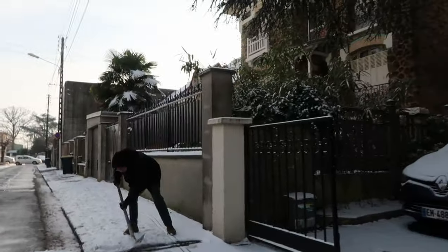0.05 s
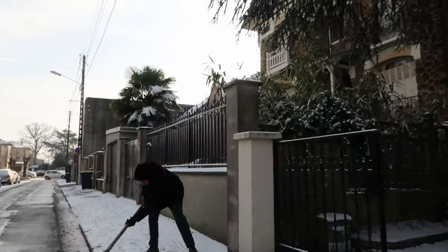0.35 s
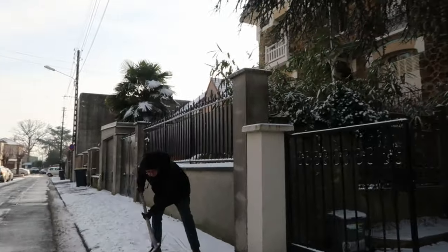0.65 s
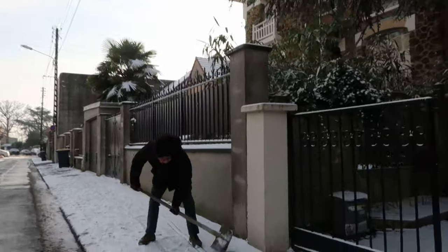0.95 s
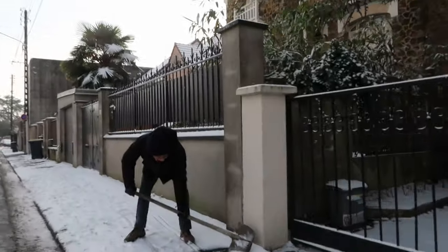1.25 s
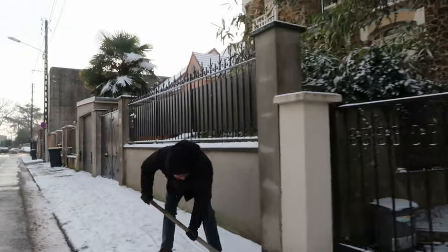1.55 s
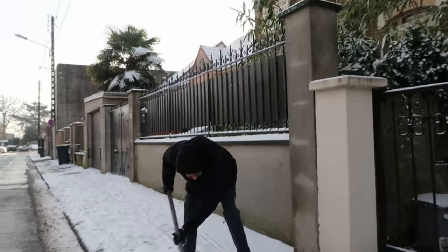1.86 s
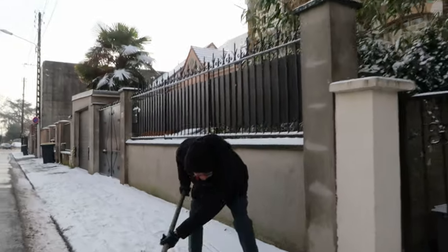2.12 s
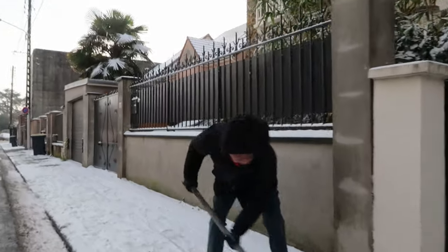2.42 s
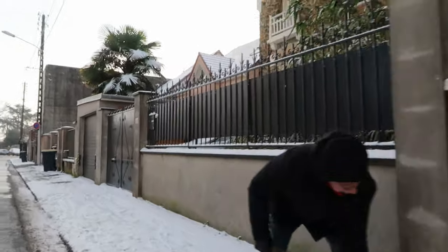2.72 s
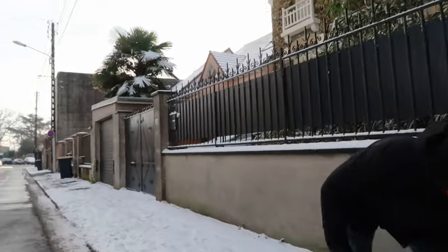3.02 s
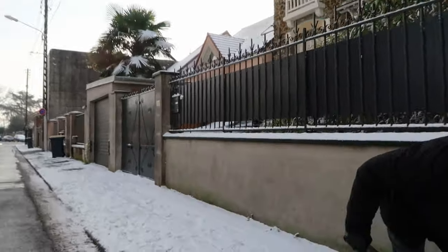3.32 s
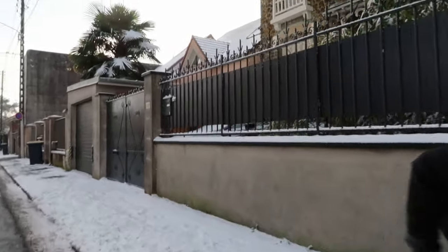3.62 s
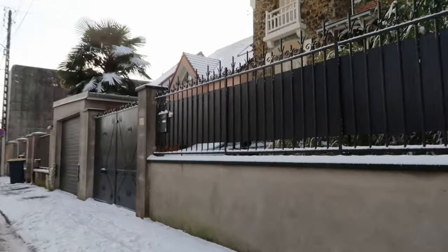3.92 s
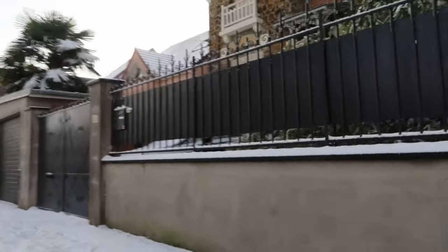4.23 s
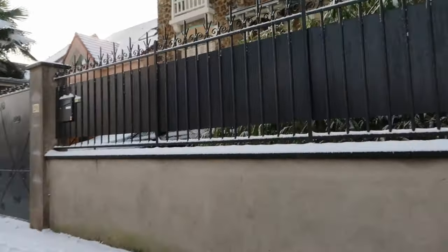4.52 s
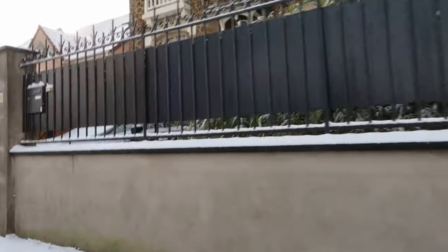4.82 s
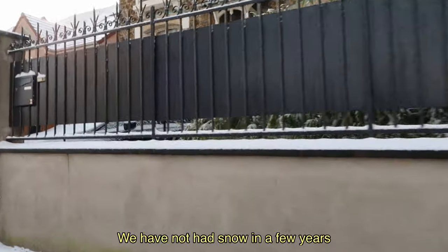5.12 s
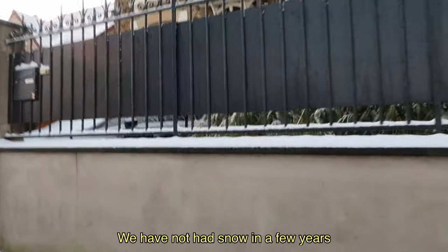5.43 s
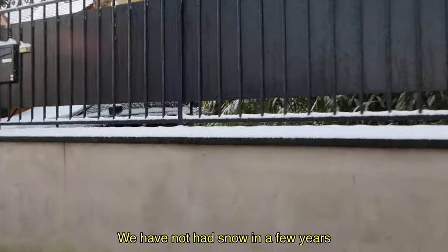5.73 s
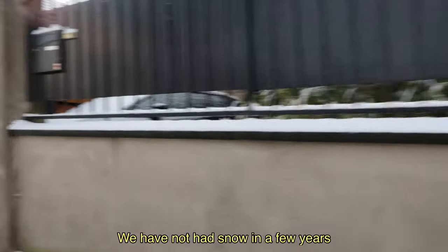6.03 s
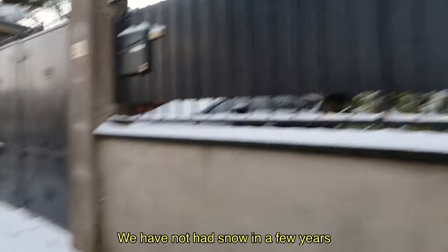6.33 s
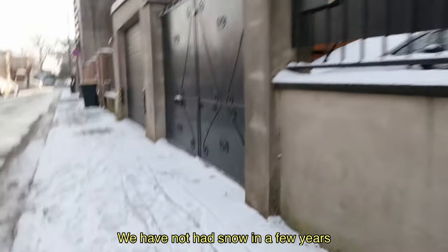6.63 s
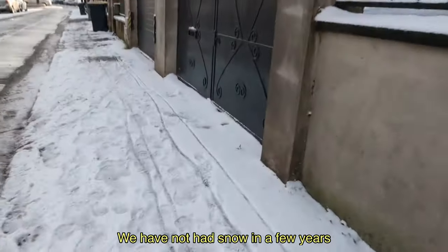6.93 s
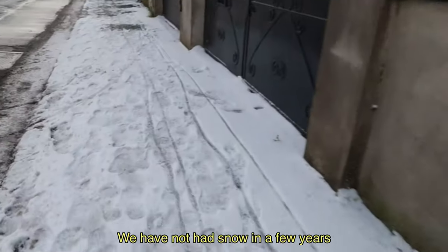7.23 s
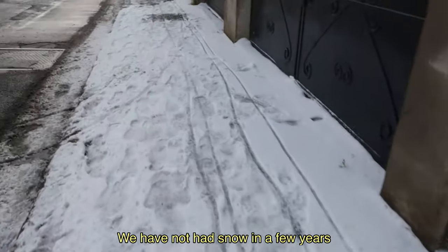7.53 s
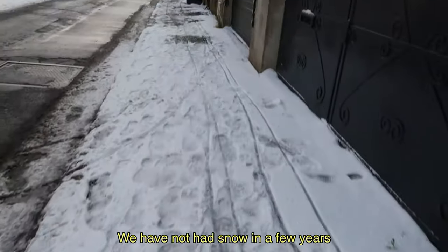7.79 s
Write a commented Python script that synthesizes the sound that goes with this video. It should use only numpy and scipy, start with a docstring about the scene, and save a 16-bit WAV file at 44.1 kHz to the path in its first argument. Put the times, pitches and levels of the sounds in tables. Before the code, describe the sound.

A metal shovel scrapes snow off gritty pavement in repeated strokes on a quiet street, with wind buffeting the microphone and two crunching footsteps.

```python
"""A quiet street: a metal shovel scrapes snow off the pavement in strokes, to the right of the microphone.
The edge chatters over grit, catches and rings the blade, whose resonances shift from stroke to stroke.
Every push swells, holds and dies away by one rule. Bits of ice tick, a load of snow swishes off,
walls echo faintly. Near the end two footsteps thud and crunch on snow. Gusts buffet the microphone;
the steady street hush is turned down by the recorder after loud scrapes and creeps back up."""
import sys
import numpy as np
from scipy import signal
from scipy.fft import rfft, irfft, next_fast_len
from scipy.io import wavfile
from scipy.ndimage import uniform_filter1d, minimum_filter1d, map_coordinates

SR = 44100
rng = np.random.default_rng(int(sys.argv[2]) if len(sys.argv) > 2 else 0)


def to_wav(sig):
    """Store sig (one row per channel, or 1-D mono) as 16-bit WAV at the path in sys.argv[1].

    Samples outside -1..1 are clipped; the rate is SR.
    """
    pcm = np.clip(np.atleast_2d(sig), -1, 1) * 32767
    pcm = np.round(pcm).astype(np.int16)
    wavfile.write(sys.argv[1], SR, pcm.T)  # frames by channels


N = 355357

# Blade modes, varying with grip and snow load. Each row: centre in Hz, width in Hz, level in dB.
BLADE_FIRST = [(267, 30, -1), (812, 26, 0), (990, 40, -3), (1275, 95, 2.5), (1730, 79, 0.5), (1944, 70, -1),
               (2380, 250, -4.5), (3350, 210, 1), (3820, 150, -6.5), (4360, 84, -4.5), (4990, 88, -8),
               (5720, 60, -1)]
BLADE_SET_DOWN = [(260, 72, 10), (685, 45, 10), (850, 65, 12.5), (977, 36, 14.5), (1280, 44, -9),
                  (3300, 190, -5)]
BLADE_DIGGING = [(296, 60, 1.5), (614, 97, 0), (1030, 63, 0), (1253, 95, 4.5), (2340, 330, -4.5),
                 (3180, 190, -8), (3890, 520, -4), (4420, 130, 0)]
BLADE_SLIDING = [(622, 40, 2), (845, 31, -6), (1010, 47, 0), (1196, 160, -1), (1870, 40, -6),
                 (2270, 180, -5), (3190, 210, -10.5), (4000, 520, -5.5), (5140, 240, -15)]
BLADE_LIFTING = [(355, 35, 7.5), (612, 35, 2.5), (735, 41, -4), (1040, 50, -7), (1318, 45, 5.5),
                 (1850, 120, -6), (2230, 160, -5), (4120, 350, -6)]
BLADE_NEAR = [(540, 54, -5), (645, 86, 2), (1023, 33, 6), (1200, 59, 5.5), (1406, 110, 0), (1770, 47, -2),
              (2166, 130, -1), (4330, 180, -10.5)]
BLADE_LOADED = [(562, 55, -6), (662.6, 45.5, 3.5), (1026, 38, 0), (1163, 54, -6.5), (1360, 96, -16),
                (2140, 260, -7.5), (4570, 380, -19)]
BLADE_STOPPING = [(657, 48, 4), (1017, 28, 7), (1200, 57, 2), (1360, 49, 1), (1750, 85, -13)]
BLADE_PASSED = [(690, 160, -7), (1258, 76, -1.5), (1492, 26, -4.5), (1904, 64, -8.5), (2310, 35, -6),
                (2733, 37, -7.5), (3100, 26, -11)]
BLADE_JABBING = [(511, 15, 14), (732, 18, 8), (994, 22, 2.5), (1245, 58, 2.5), (1490, 28, 5),
                 (1725, 60, -6), (2400, 380, -10)]
BLADE_QUICK = [(529, 31, 8.5), (802, 22, 8), (1030, 19, -2), (1180, 47, 4.5), (1446, 65, 0.5),
               (1930, 49, -7), (2390, 140, -5.5), (2880, 89, -10)]
BLADE_KNOCKING = [(140, 42, 9), (575, 35, -4), (770, 39, 8), (1100, 40, -4), (1200, 42, 3.5),
                  (2070, 280, -7)]
BLADE_BEHIND = [(340, 57, 8), (443, 22, 2), (513, 34, 1), (716, 51, -3.5), (1164, 60, -3), (1325, 50, -0.5),
                (1606, 40, -4), (4500, 150, -17)]
# Dull thud of a footstep on snow. Columns as above.
FOOTSTEP_THUD = [(188, 41, 11), (605, 38, 11), (826, 60, 5), (1046, 36, 4), (1270, 90, -13)]
BLADE_RESTING = FOOTSTEP_THUD  # blade silent: only the footstep sounds
# Shovel pushes, and a footstep at 6.712 s. Each row: start, rise, hold and release t60 in seconds,
# level, swell and sag in dB, body and hiss in dB re level, modes.
PUSHES = [ (0.0, .11, 0.23, .24, -18, 5.5, 13.5, -12, -3.5, BLADE_FIRST),
          (1.324, 0.0065, .07, 0.07, -39, 6, 3, -2.5, -10, BLADE_SET_DOWN),
          (1.402, 0.109, .24, .25, -18.5, 18, 0.5, -6.5, -7.5, BLADE_DIGGING),
          (1.789, 0.018, 0.17, 0.22, -15.5, 4.5, 3.5, -17.5, -8, BLADE_SLIDING),
          (2.047, 0.039, 0.022, 0.075, -17.5, 12, 10.5, -3, -10.5, BLADE_LIFTING),
          (2.952, 0.023, 0.011, .15, -32.5, 18, 7.5, 3, -5.5, BLADE_NEAR),
          (3.014, 0.15, 0.16, .17, -18, 23.5, -1.5, -5.5, -11, BLADE_NEAR),
          (3.359, 0.047, 0.16, .12, -16.5, 8.5, 4.5, -9.5, -12.5, BLADE_LOADED),
          (3.574, 0.031, 0.049, .4, -27, 10, 1, -8, -11.5, BLADE_LOADED),
          (3.749, 0.022, 0.037, 0.091, -22.5, 9, 3.5, -9.5, -20.5, BLADE_STOPPING),
          (5.086, 0.26, 0.17, 0.098, -19, 17, 6, -7, -8.5, BLADE_PASSED),
          (5.735, 0.04, 0.022, 0.2, -19, 13, 4, -5, -7, BLADE_JABBING),
          (5.856, .118, 0.083, 0.19, -17, 25, 2.5, -10.5, -9, BLADE_QUICK),
          (6.078, 0.02, 0.027, 0.15, -26, 17, 8, -13, -8.5, BLADE_PASSED),
          (6.532, 0.053, 0.038, 0.2, -34, 8, 0, -8, -13, BLADE_KNOCKING),
          (6.712, 0.026, 0.03, 0.91, -46, 12, 17, -4.5, -24, BLADE_RESTING),
          (7.563, 0.45, 0.056, 0.22, -25.5, 14, 0, -2.5, -19, BLADE_BEHIND), ]
# Edge catches, and footsteps at 6.719 and 7.325 s. Each row: time in seconds, level in dB,
# rise and t60 in seconds, dip beforehand in dB, body in dB re the push's body.
IMPACTS = [(0.045, -18, 0.0022, 0.06, 2, 4), (0.088, -18.5, 0.002, 0.2, 10.5, -19),
           (0.198, -17, .011, 0.05, 10.5, -18), (0.277, -24.5, 0.0048, 0.083, -8, 6),
           (0.315, -15.5, 0.0056, 0.064, -10, -0.5), (0.343, -22.5, 0.0023, 0.1, 13, 5.5),
           (1.323, -22, 0.0049, 0.048, 1, -0.5), (1.358, -32, 0.0015, 0.049, 2, -6),
           (1.390, -31.5, 0.0016, 0.079, 8, 6), (1.497, -26, 0.0033, 0.1, 0, -8),
           (1.530, -19, 0.0039, 0.09, 3, 4), (1.604, -15.5, 0.0022, 0.17, 12.5, -1.5),
           (1.627, -20, .002, 0.033, 11, -5), (1.792, -25, .001, 0.058, 2.5, -9),
           (1.943, -20, 0.0056, 0.067, 0.5, -1), (1.967, -25.5, .003, .05, 2.5, -1),
           (2.052, -27.5, .002, 0.11, -4.5, -4), (2.103, -21.5, 0.0028, 0.077, 6.5, -8),
           (2.953, -37.5, 0.0018, 0.14, 0, 2), (3.225, -14, .004, 0.05, 1.5, -10),
           (3.334, -14, 0.0027, 0.052, -1, -2.5), (3.452, -16.5, 0.0034, 0.16, 0.5, -2),
           (3.559, -17.5, .006, 0.066, -2, -17), (3.724, -18, 0.0057, 0.08, -6, 0),
           (5.082, -25.5, 0.0025, 0.09, 0, -2), (5.261, -23, 0.0054, 0.12, 2, -10),
           (5.313, -22, 0.0064, 0.091, 6.5, -2), (5.377, -20, 0.003, 0.06, 0, -7),
           (5.418, -23.5, 0.0037, 0.056, 2, -3), (5.499, -16.5, 0.013, 0.074, 1, 4.5),
           (5.696, -17, .005, 0.092, 2, -9), (5.739, -22, .002, 0.15, 6, -1),
           (6.118, -19, 0.0035, 0.047, 1, 5), (6.483, -29.5, 0.0046, 0.079, -2, -1),
           (6.561, -28, 0.0017, 0.075, 7, 8), (6.580, -26.5, 0.0035, 0.076, 5, 1.5),
           (6.618, -26, 0.0033, 0.046, 1, -17), (6.719, -29.5, 0.0018, 0.17, -2, 4),
           (7.325, -24.5, 0.0029, 0.17, 0, -5.5), (7.962, -23.5, 0.005, 0.11, 1, 1.5)]
# Street hush as the recorder's gain dips and recovers. Each row: time in seconds, midrange level in dB.
HUSH_LEVEL = [(0.5, -42.5), (0.8, -46), (1.3, -45.5), (2.4, -50), (2.75, -44.5), (3.9, -58), (4.6, -56),
              (4.92, -45.5), (6.27, -45.5), (6.47, -49.5), (6.8, -41), (7.1, -49.5), (7.45, -42)]


def amp(db):
    """Decibels to gain."""
    return 10 ** (np.asarray(db) / 20)


def unit(x):
    """Scale to rms 1."""
    return x / np.sqrt(np.mean(x ** 2) + 1e-20)


def at_hz(points, hz):
    """Interpolate (Hz, value) points on a log axis."""
    knots_hz, values = np.transpose(points)
    return np.interp(np.log(hz + 1), np.log(knots_hz + 1), values)


def at_time(points, time_s):
    """Interpolate (seconds, value) points."""
    return np.interp(time_s, *np.transpose(points))


def wobble(rate_hz, n):
    """Smooth random curve, rate_hz knots a second."""
    knots = rng.standard_normal(int(n * rate_hz / SR) + 4)
    return map_coordinates(knots, [np.arange(n) * rate_hz / SR])


def filtered(x, response):
    """Apply a complex frequency response."""
    n = x.shape[-1]
    size = next_fast_len(n + 4096)
    return irfft(rfft(x, size) * response(np.fft.rfftfreq(size, 1 / SR)), size)[..., :n]


def resonance(f, centre_hz, width_hz):
    """Causal response of one mode, 1 at its centre."""
    return 1j * f * width_hz / (centre_hz ** 2 - f ** 2 + 1j * f * width_hz)


def add(track, start_s, sound):
    """Mix a sound into the track."""
    part = track[:, max(round(start_s * SR), 0):][:, :sound.shape[-1]]
    part += sound[..., :part.shape[-1]]


def swell(age_s, rise_s, hold_s, t60_s, swell_db, sag_db):
    """Gain of an effort that builds, flattens, sags while held, then dies away."""
    building = np.clip(1 - age_s / rise_s, 0, 1) ** 1.3
    held = np.clip((age_s - rise_s) / hold_s, 0, 1)
    released = np.maximum(age_s - rise_s - hold_s, 0) / t60_s
    return np.clip(age_s / 0.0011, 0, 1) * amp(-swell_db * building - sag_db * held - 60 * released)


def patchy(x, depth_db):
    """Vary the strength of each narrow band at random over time."""
    bands = signal.stft(x, nperseg=512)[2]
    field = uniform_filter1d(rng.standard_normal(bands.shape), size=2, axis=0)
    field = unit(uniform_filter1d(field, size=9, axis=1))
    return signal.istft(bands * amp(depth_db * np.clip(field, -2, 2)), nperseg=512)[1][:len(x)]


def stereo_noise(spectrum, likeness, patchy_db=0):
    """Coloured noise with a left-right likeness set per frequency."""
    angle = lambda f: np.arccos(np.clip(at_hz(likeness, f), -1, 1)) / 2
    pair = rng.standard_normal((2, N))
    if patchy_db:
        pair = np.array([patchy(noise, patchy_db) for noise in pair])
    mid, side = filtered(pair, lambda f: amp(at_hz(spectrum, f)) * [np.cos(angle(f)), np.sin(angle(f))])
    return np.array([mid + side, mid - side])


def ports(x, time_s, gap_m=0.03):
    """Sound reaches the right microphone port first and louder; in the top treble the two channels turn nearly
    opposite."""
    # Each row: time in seconds, degrees right of the microphone axis.
    bearing = [(0, 13), (1.7, 14.6), (3.4, 45), (5.4, 51.5), (6, 46), (8, 37)]
    lag_s = gap_m * np.sin(np.radians(at_time(bearing, time_s))) / 343
    sides = np.array([[-1], [1]])
    phase = lambda f: np.minimum(4.2 * np.tanh(2 * np.pi * f * lag_s / 4.2), 3.1)
    lean = lambda f: amp(at_hz([(3000, .38), (9000, 0)], f) * sides)
    return filtered(x, lambda f: lean(f) * np.exp(.5j * phase(f) * sides))


def slips(n, rate_hz, spread_db, powder):
    """Friction force: tiny uneven slips over the smooth rub of powder snow."""
    sizes = rng.standard_normal(n) * amp(spread_db * np.clip(rng.standard_normal(n), -2, 2))
    impulses = unit(sizes * (rng.random(n) < rate_hz / SR))
    return unit(impulses + powder * rng.standard_normal(n))


def crackle(n, rate_hz, gain_db, t60_s):
    """Ice grains burst in short, sharp cracks."""
    bursts = (rng.random(n) < rate_hz / SR) * amp(3 * np.clip(rng.standard_normal(n), -2, 1.5))
    decay = amp(-60 * np.arange(SR // 100) / SR / t60_s)
    cracks = signal.fftconvolve(bursts, decay)[:n] * rng.standard_normal(n)
    return amp(gain_db) * filtered(cracks, lambda f: 1j * f / (2500 + 1j * f))


def sticking(t, lead_s):
    """Gain dip as the edge sticks just before a catch."""
    catch_s, _, _, _, dip_db, _ = np.transpose(IMPACTS)[:, :, None]
    dips_db = dip_db * (catch_s > t) * np.exp(-abs(catch_s - t) / lead_s)
    return amp(-dips_db.max(axis=0))


def ring_modes(force, modes, time_s, wander_db, grit_db=-13):
    """A force rings the modes, each wandering in level. Returns stereo middle, body and hiss at rms 1."""
    # Grit spectrum. Each row: frequency in Hz, density in dB.
    grit = [(120, -14), (260, 1.5), (600, 3.5), (1300, 4), (2500, 0.5), (4500, -4.5), (7000, -5),
            (10000, -13), (13000, -14), (15500, -56)]
    n = len(force)
    drives = np.array([force * amp(db + wander_db * np.clip(wobble(15.93, n), -2, 1.2))
                       for _, _, db in modes])
    responses = lambda f: np.array([resonance(f, hz, width_hz) for hz, width_hz, _ in modes])
    ring = filtered(drives, lambda f: responses(f) * abs(resonance(f, 1100, 3600)))
    sound = filtered(force, lambda f: amp(grit_db + at_hz(grit, f))) + ring.sum(axis=0)
    flex = 1 + 0.00792 * wobble(14, n)  # bending detunes the modes
    sound = map_coordinates(sound, [np.cumsum(flex)])
    body = lambda f: 1 / (1 + (f / 690) ** 8)
    hiss = lambda f: 1 - 1 / (1 + (f / 3000) ** 8)
    bands = filtered(sound, lambda f: np.array([1 - body(f) - hiss(f), body(f), hiss(f)]))
    return np.array([band / band.mean(axis=0).std() for band in ports(bands[:, None], time_s)])


def scrapes():
    """Pushes drag the chattering edge over the pavement; one row is a footstep's thud on snow."""
    # Scrape unevenness. Each row: swings per second, depth in dB.
    unevenness = [(45, 1.16), (260, 0.08)]
    out = np.zeros((2, N))
    for start_s, rise_s, hold_s, t60_s, db, swell_db, sag_db, body_db, hiss_db, modes in PUSHES:
        age_s = np.arange(0, rise_s + hold_s + t60_s, 1 / SR)
        n = len(age_s)
        chatter = amp(sum(depth_db * wobble(rate_hz, n) for rate_hz, depth_db in unevenness))
        rub = slips(n, rate_hz=8000, spread_db=4, powder=1.07)
        force = chatter * patchy(rub, depth_db=3.5)  # the contact point roams along the edge
        force += crackle(n, rate_hz=110, gain_db=8.5, t60_s=0.0044)
        force *= sticking(start_s + age_s, lead_s=0.036)
        bands = ring_modes(force, modes, start_s + rise_s, wander_db=4)
        sound = np.tensordot(amp(db + np.array([0, body_db, hiss_db])), bands, 1)
        add(out, start_s, swell(age_s, rise_s, hold_s, t60_s, swell_db, sag_db) * sound)
    return out


def gusts(breeze_db=-52):
    """Gains of buffeting, rumble and swirl: gusts rise, hold and die over a faint breeze."""
    # Each row: start and hold in seconds, buffeting in dB, rumble and swirl in dB re buffeting.
    gust_rows = [(0.0, 1, -42, -4.5, -4), (1.16, 0.32, -41.5, 1, -1), (1.912, 0.039, -32, 0, 2),
                 (2.061, 0.19, -22.5, -7, 6), (2.327, 0.31, -22.5, -12.5, -4.5),
                 (3.003, 0.048, -23, -16, -23), (4.25, 0.44, -32.5, -3.5, -3), (4.8, 0.35, -33.5, -12, -29),
                 (5.274, 0.14, -24.5, -18, -7.5), (5.595, 0.044, -31.5, -16.5, -36),
                 (5.942, 0.035, -33, -26, -42), (6.43, 0.17, -38, -13, -46), (6.826, 0.32, -41, 0.5, -11)]
    t = np.arange(N) / SR
    power = np.outer([1, 1, 0], np.ones(N)) * amp(breeze_db) ** 2
    for start_s, hold_s, db, rumble_db, swirl_db in gust_rows:
        shape = swell(t - start_s, rise_s=0.11, hold_s=hold_s, t60_s=0.8, swell_db=24, sag_db=0)
        power += np.outer(amp(db + np.array([0, rumble_db, swirl_db])), shape) ** 2
    return np.sqrt(power)


def wind(cutoff_hz=560):
    """Deep rumble and lumpy buffeting on the ports; single eddies thump for a cycle or two."""
    # Each row: frequency in Hz, density in dB.
    buffet_spectrum = [(15, -50), (25, -18), (65, 2), (128, 3.5), (200, 2.5), (303, -3.5), (418, -11.5),
                       (461, -14), (568, -25), (700, -18), (910, -69), (1540, -120)]
    # Each row: start in seconds, level in dB, frequency in Hz.
    eddies = [(0.658, -12, 62), (2.269, 0.5, 207), (2.304, -2.5, 80.7), (2.383, 0, 132), (2.525, -17, 109),
              (2.606, -8, 116), (2.703, 1.5, 148), (2.896, -4, 222), (4.372, -7, 107), (4.451, -9, 130),
              (4.575, -8, 101), (5.039, -19, 200), (4.644, -7.5, 118), (4.668, -6.5, 139),
              (4.782, -7.5, 109), (5.641, -12, 175), (6.575, -19, 140), (6.718, -9, 185)]
    buffet_gain, rumble_gain, swirl_gain = gusts()
    lumps = amp(4.17 * np.clip(wobble(65, N), -2, 1.2))
    air = lumps * stereo_noise(buffet_spectrum, likeness=[(50, 1.0), (130, 1.0), (300, 0.99)])
    rumble = filtered(air, lambda f: 1 / (1 + (f / 100) ** 6))
    out = rumble_gain * unit(rumble) + buffet_gain * unit(air - rumble)
    # Strong gusts break up between the ports and push them opposite ways.
    swirl_spectrum = [(40, -20), (100, -8), (220, -0.5), (400, -6.5), (700, -14.5)]
    swirl = unit(stereo_noise(swirl_spectrum, likeness=[(100, 0.92)])[0])
    out += swirl_gain * swirl * np.array([[1], [-1]])
    t = np.arange(SR // 20) / SR
    for start_s, db, hz in eddies:
        cycles = hz * t
        thump = cycles / 0.9 * np.exp(1 - cycles / 0.32) * np.sin(2 * np.pi * cycles)
        add(out, start_s, amp(db + rng.normal(0, 1, (2, 1))) * thump)
    return filtered(out, lambda f: 1 / np.sqrt(1 + (f / cutoff_hz) ** 12))


def street():
    """Steady street hush; the recorder's gain, a set curve, drops after loud scrapes and creeps back."""
    # Each row: frequency in Hz, density in dB.
    spectrum = [(24, -41), (40, -4.5), (80, -23), (169, -10), (233, -5.5), (329, -4.5), (490, -4),
                (643, -7.5), (1140, -9), (3830, -21.5), (4560, -22.5), (5160, -24.5), (8000, -29),
                (11400, -30.5), (15000, -35)]
    # Each row: frequency in Hz, left-right likeness.
    likeness = [(60, 1), (130, 0.99), (290, 1), (640, 0.98), (1410, 0.9), (3100, 0.7), (6820, -0.099),
                (15000, -1.05)]
    air = stereo_noise(spectrum, likeness, patchy_db=1.6)
    midrange = filtered(air.mean(axis=0), lambda f: (f > 700) & (f < 5000))
    level_db = at_time(HUSH_LEVEL, np.arange(N) / SR) + 0.067 * wobble(23, N)
    return amp(level_db) * air / midrange.std()


def crumbs(rate_hz, gain_db, t60_s):
    """Loose snow grains rattle faintly at random; their level follows the hush."""
    drops = (rng.random(N) < rate_hz / SR) * amp(1.4 * np.clip(rng.standard_normal(N), -2, 1.5))
    decay = amp(-60 * np.arange(SR // 50) / SR / t60_s)
    grains = signal.fftconvolve(drops, decay)[:N] * rng.standard_normal((2, N))
    rattle = filtered(grains + grains[::-1] / 2, lambda f: resonance(f, 1800, 5600) ** 4)
    return amp(at_time(HUSH_LEVEL, np.arange(N) / SR) + gain_db) * rattle


def squeals():
    """Stick-slip briefly locks on to one mode and the blade sings roughly."""
    # Each row: centre and half length in seconds, pitch in Hz, level in dB.
    squeal_rows = [(0.027, .009, 1260, -17.5), (1.694, .009, 1226, -14), (1.719, .012, 1232, -12),
                   (3.19, .011, 1163, -13), (3.407, .015, 669, -14.5), (3.417, .012, 1023, -14),
                   (3.785, 0.016, 662, -20), (6.002, 0.01, 785, -15), (6.047, .014, 807, -12)]
    out = np.zeros((2, N))
    for centre_s, half_s, hz, db in squeal_rows:
        t = np.arange(-2 * half_s, 2 * half_s, 1 / SR)
        phase = 2 * np.pi * np.cumsum(hz * (1 + 0.02 * wobble(163, len(t)))) / SR
        tone = amp(db) * np.exp(-(t / half_s) ** 2) * np.sin(phase)
        add(out, centre_s + t[0], ports(tone, centre_s))
    return out


def impacts(hiss_trim_db=-3.5):
    """The edge catches or a foot lands: a dying burst of slips, coloured like the nearest push."""
    out = np.zeros((2, N))
    t = np.arange(-SR // 200, SR // 4) / SR
    age_s = np.maximum(t, 0)
    for time_s, db, rise_s, t60_s, _, thud_db in IMPACTS:
        nearest_push = min(PUSHES, key=lambda push: max(push[0] - time_s, time_s - sum(push[:3])))
        *_, body_db, hiss_db, modes = nearest_push
        shape = amp(-60 * age_s / t60_s) * (1 - np.exp(-age_s / rise_s))
        force = shape * slips(len(t), rate_hz=9000, spread_db=2, powder=1.2)
        bands = ring_modes(force, modes, time_s, wander_db=3.5)
        gains = amp(db + np.array([0, body_db + thud_db, hiss_db + hiss_trim_db]))
        crest = shape.max() / np.sqrt(np.mean(shape ** 2))
        add(out, time_s + t[0], np.tensordot(gains, bands, 1) / crest)
    return out


def ticks(gain_db):
    """Clicks with one broad resonance each: ice bits, footstep crunches and a wind pop."""
    # Each row: start in seconds, relative peak in dB, resonance in Hz, t60 in seconds.
    # A wind eddy pops on the microphone at 2.701 s; footsteps crunch at 6.718 s and near 7.33 s.
    tick_rows = [(0.048, -8, 3560, 0.03), (0.631, -20, 1000, 0.049), (0.635, -18, 3200, 0.017),
                 (0.804, -13.5, 1590, 0.011), (.906, -18, 1550, 0.012), (.919, -16.5, 1600, 0.0063),
                 (.967, -18.5, 2900, .01), (0.972, -7, 1820, 0.0053), (1.005, -21, 2250, 0.014),
                 (1.196, -15.5, 880, 0.032), (1.331, -17.5, 313, 0.035), (1.533, -7, 3200, .06),
                 (1.628, -9, 3000, .025), (2.056, -14, 4000, .04), (2.105, -16, 2500, .035),
                 (2.701, -18, 644, 0.013), (2.969, -17, 1390, .04), (5.353, -11, 3300, 0.033),
                 (6.22, -15.5, 800, 0.018), (6.718, -16, 834, 0.022), (7.301, -23, 1300, 0.046),
                 (7.318, -17, 1020, 0.037), (7.328, -9.5, 1140, 0.014), (7.499, -10.5, 950, 0.016)]
    out = np.zeros((2, N))
    t = np.arange(SR // 12) / SR
    for start_s, db, hz, t60_s in tick_rows:
        shape = amp(-60 * t / t60_s) * (1 - np.exp(-t / 0.00038))
        burst = rng.standard_normal(len(t)) * shape
        click = unit(filtered(burst, lambda f: resonance(f, hz, .8 * hz) ** 3 + .02))
        crest = shape.max() / shape.std()
        add(out, start_s, ports(amp(db + gain_db) * click / crest, start_s))
    return out


def thrown_snow(centre_s, half_s, level_db):
    """A load of snow leaves the blade with a soft swish."""
    # Each row: frequency in Hz, density in dB.
    spectrum = [(300, -9), (800, -3), (1800, -7), (3000, -19), (5000, -12), (6400, -27), (7500, -11),
                (8600, -28), (15000, -39)]
    shape = np.exp(-((np.arange(N) / SR - centre_s) / half_s) ** 2)
    return amp(level_db) * shape * unit(stereo_noise(spectrum, likeness=[(1000, 1.0)]))


def near_echo(x, t60_s, delay_s):
    """A nearby wall and railings scatter a short, bright echo, different at each port."""
    # Each row: frequency in Hz, echo gain in dB.
    scatter = [(200, -15), (600, -22), (1500, -2.5), (4000, 1.5), (10000, -20.5)]
    t = np.arange(SR // 20) / SR
    burst = rng.standard_normal((2, len(t))) * amp(-60 * t / t60_s) * (t > delay_s)
    burst = filtered(burst / np.linalg.norm(burst[0]), lambda f: amp(at_hz(scatter, f)))
    return signal.fftconvolve(x, burst, axes=1)[:, :N]


def street_echo(x):
    """House fronts and garden walls reverberate; the treble dies first."""
    # Each row: frequency in Hz, t60 in seconds.
    decay_times = [(200, 0.42), (2000, 0.4), (10000, 0.055)]
    hz, t, bands = signal.stft(rng.standard_normal((2, SR // 2)), SR, nperseg=256)
    tail = signal.istft(bands * amp(-60 * t / at_hz(decay_times, hz)[:, None]), SR, nperseg=256)[1]
    tail = tail + 0.7 * tail[::-1]  # close ports share part of the echo
    return signal.fftconvolve(x, tail / np.linalg.norm(tail[0]), axes=1)[:, :N]


def scene():
    """Shovel and footsteps, their echoes, loose snow, wind and street."""
    direct = scrapes() + impacts() + squeals() + ticks(gain_db=-12)
    direct += thrown_snow(centre_s=2.52, half_s=0.04, level_db=-42)
    echoes = amp(-14) * near_echo(direct, t60_s=0.043, delay_s=0.003) + amp(-20.5) * street_echo(direct)
    return direct + echoes + crumbs(rate_hz=8.2, gain_db=16, t60_s=0.0097) + wind() + street()


def record(dry):
    """A quick limiter holds down the peaks; a sharp low-pass follows."""
    ceiling, top_hz = 0.76, 15200
    needed_gain = np.minimum(1, ceiling / (abs(dry).max(axis=0) + 1e-9))
    gain = uniform_filter1d(minimum_filter1d(needed_gain, size=201), size=101)
    return filtered(dry * gain, lambda f: f < top_hz)


dry = scene()
out = record(dry)
to_wav(out)
```